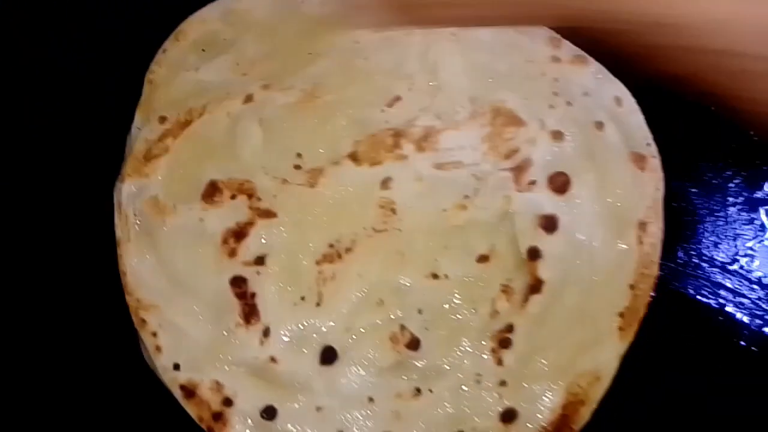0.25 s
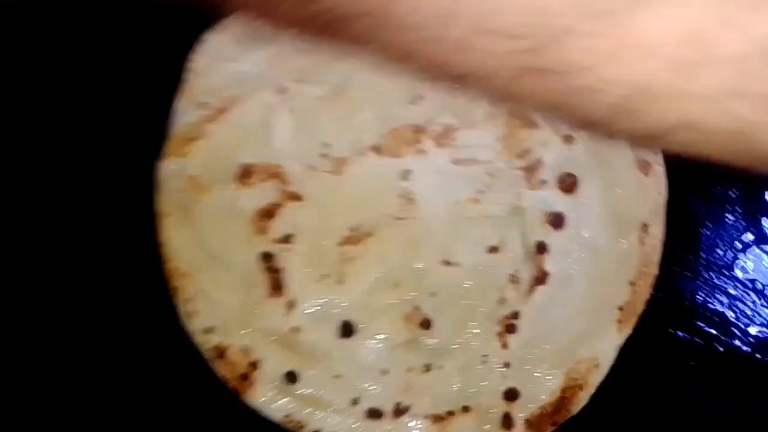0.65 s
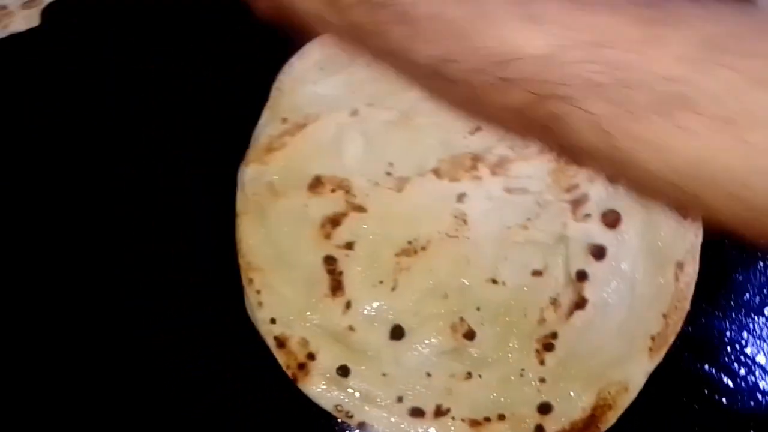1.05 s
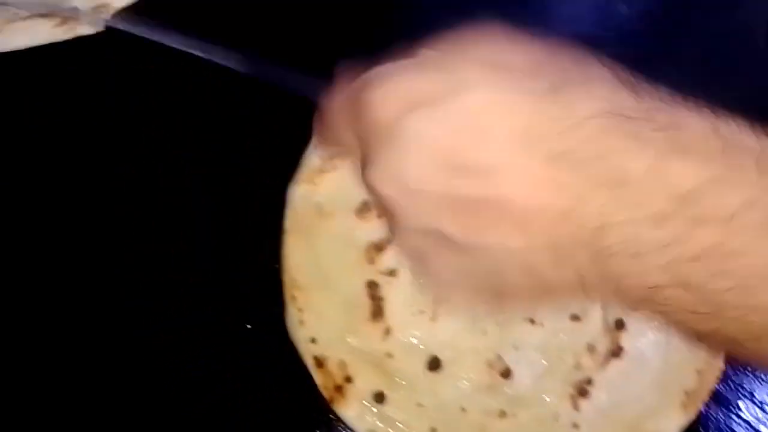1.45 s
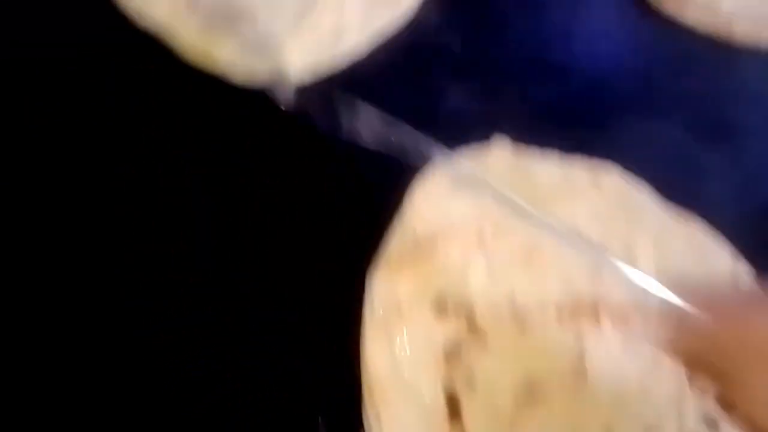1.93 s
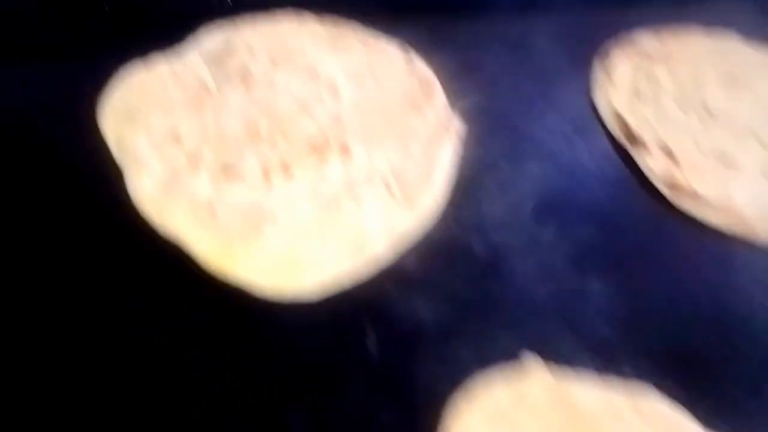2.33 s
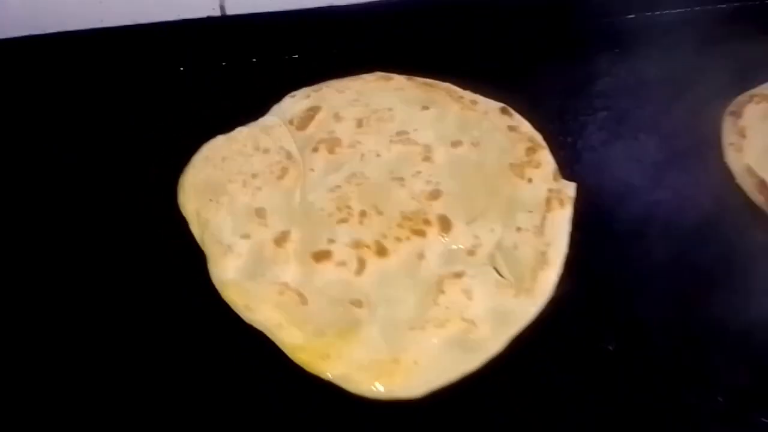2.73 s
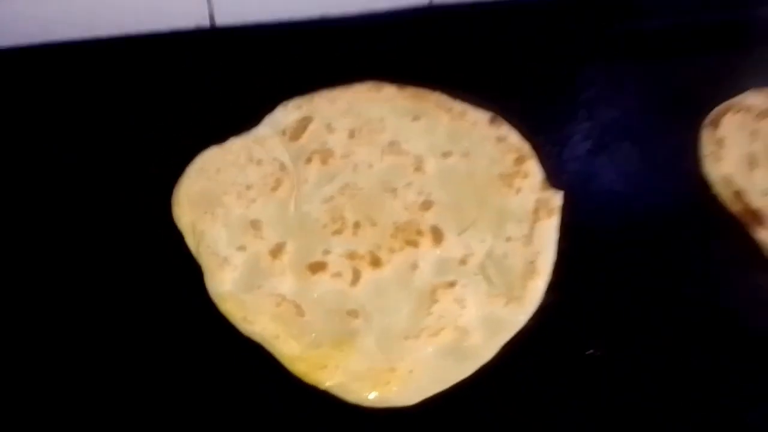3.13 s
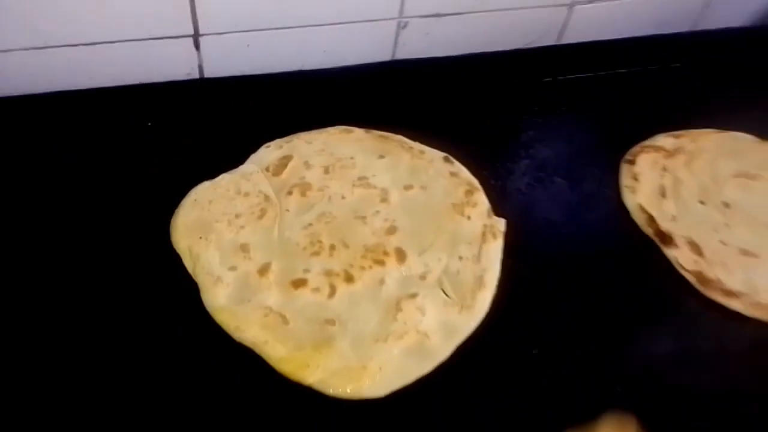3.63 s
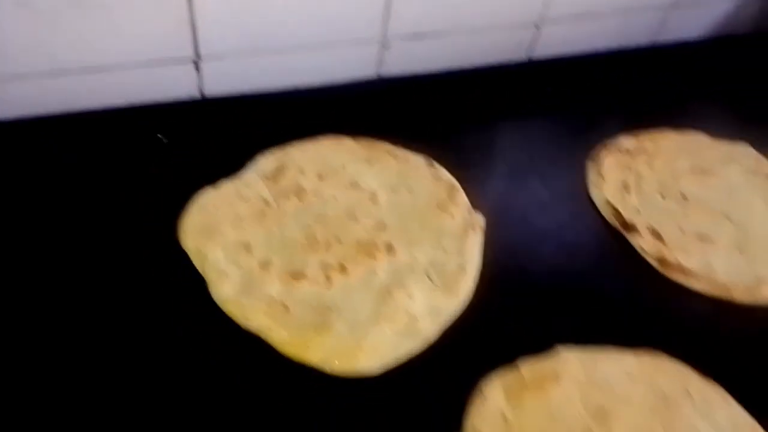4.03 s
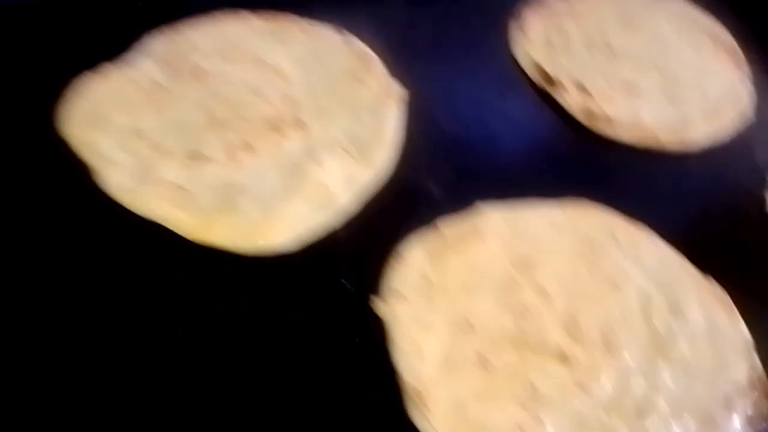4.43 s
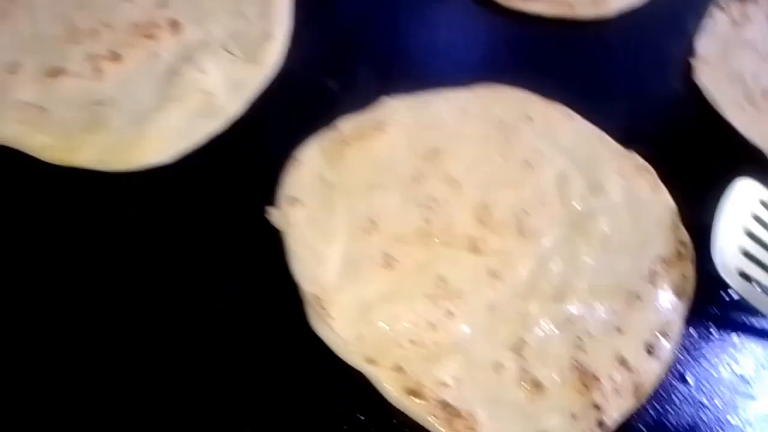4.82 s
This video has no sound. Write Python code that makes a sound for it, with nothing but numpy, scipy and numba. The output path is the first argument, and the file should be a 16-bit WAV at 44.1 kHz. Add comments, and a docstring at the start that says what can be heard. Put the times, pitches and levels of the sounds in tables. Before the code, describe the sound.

A metal spatula scrapes and knocks on a hot griddle while flatbreads faintly sizzle over a low fan hum.

```python
"""Flatbreads fry on a hot flat griddle close to a phone; an extractor fan hums in the tiled kitchen. From 0.2 s
a steel spatula scrapes, its stick-slip clicks ringing the blade, and fat spits. At 1.1 s knocks thud on the
plate. More strokes follow, the fat sputters again around 3 s, and the hardest knock lands near 4 s. From 4.55 s
the spatula knocks and scrapes again, its blade ringing with other modes."""
import sys
import numpy as np
from scipy import signal
from scipy.fft import rfft, irfft
from scipy.io import wavfile
from scipy.ndimage import uniform_filter1d
from numba import njit

SR = 44100
rng = np.random.default_rng(int(sys.argv[2]) if len(sys.argv) > 2 else 0)


def int16_out(signal):
    """Quantize to a 16-bit WAV file."""
    q = np.round(np.clip(np.atleast_2d(signal).T, -1, 1) * 32767)
    wavfile.write(sys.argv[1], SR, q.astype(np.int16))


N = 223665
T = np.arange(N) / SR
BURST_SAMPLES = 2000

# Grit between the blade's rings: f/Hz, density/dB
RASP_SPECTRUM = [(150, -28.5), (250, -17), (569, -15.5), (1150, -11.5), (1430, -20), (1560, -7), (1730, -4),
                 (2320, -10.5), (2850, -6.5), (3000, -18), (3350, -8), (6260, -2.5), (7600, -14),
                 (15000, -37)]
def scrapes():
    """Dense uneven slips ring the blade's modes, sing and squeal in its bend and edge, rasp in between."""
    push_db, bright_db, weight_db, bend_hz, edge_hz, grit_db = strokes()
    chatter = undb(push_db + 2.6 * np.clip(walk(110), -2, 1.5))
    slips = chatter * unit(rng.standard_normal(N) * undb(0.77 * rng.exponential(size=N)))

    def colour(hz, span=slice(N)):
        """Bright strokes lift high modes, heavy ones low; modes near bend and edge are favoured."""
        octaves = np.log2(hz / 2100)
        if octaves > 0:
            tilt_db = (bright_db[span] - 3.5) * np.clip((octaves - .45) / 0.99, 0, 1.2)
        else:
            tilt_db = (weight_db[span] + 13.5) * min(-octaves / 1.6, 1)
        near_bend = np.exp(-(np.log2(hz / bend_hz[span]) / 0.22) ** 2)
        near_edge = np.exp(-(np.log2(hz / edge_hz[span]) / 0.11) ** 2)
        return undb(tilt_db + 4.3 * (near_bend + near_edge))

    def drive(hz, span):
        """Each mode is caught and let go as the grip shifts."""
        return slips[span] * colour(hz, span) * undb(3.62 * walk(25.022)[span])

    rings = blades(drive, width_scale=0.9)
    bend = sweep(sweep(sweep(slips, bend_hz, 10.3), bend_hz, 4.7), bend_hz, 4.0)
    squeal_hz = bend_hz * (1 + 0.045 * walk(30))
    squeal = sweep(sweep(slips * undb(7.0 * walk(34.96)), squeal_hz, 41.0), squeal_hz, 9.9)
    edge = sweep(sweep(slips * undb(bright_db + 9.0 * walk(27.24)), edge_hz, 38.0), edge_hz, 2.6)
    bands = list(third_octaves(RASP_SPECTRUM))
    grit = sum(noise * colour(hz) for hz, noise in bands) / np.std(sum(noise for _, noise in bands))
    rasp = chatter * undb(grit_db) * grit
    return undb(18.5) * rings + undb(9) * (bend + squeal) + undb(-3.5) * edge + undb(-7) * rasp


# Blade strokes: t/s, rise/s, hold/s, fall/(dB/s), level/dB, start brightness/dB, pressed brightness/dB,
# weight on plate/dB, start bend f/Hz, end bend f/Hz, edge f/Hz at 0 dB brightness, grit/dB
BLADE_STROKES = [(0.188, 0.0018, 0.026, 80, -37.5, -3, -20.5, -22.5, 1645, 1760, 4940, -1),
                 (0.335, 0.051, 0.044, 241, -44, -13.5, -15.5, -25, 1780, 2080, 5100, 5),
                 (0.516, 0.017, 0.045, 82, -64.5, -6, 2, 2, 2150, 1780, 4660, -12),
                 (1.063, 0.035, 0.0025, 502, -43.5, -1, -8, -5.5, 2390, 2260, 4200, 3),
                 (1.63, 0.071, 0.13, 197, -60.5, -2.5, -8, -6, 2490, 1560, 3970, -0.5),
                 (1.974, 0.05, 0.18, 202, -69.5, -2, -10.5, -7, 1780, 1920, 4300, 0),
                 (2.439, 0.0047, 0.011, 458, -46, 9, -1.5, -10, 2300, 1910, 4770, 3.5),
                 (2.458, .01, 0.13, 152, -55.5, -9.5, -6, -23, 1660, 1660, 4160, -4),
                 (2.509, 0.097, 0.045, 302, -48, -2, -4, -20, 1850, 2160, 5100, 0.5),
                 (2.649, 0.021, 0.05, 153, -44.5, -11, -11, -21, 2740, 1815, 5160, -2),
                 (3.911, 0.02, 0.0019, 603, -42.5, -10, -4, -7, 2200, 2280, 3900, 0),
                 (3.958, 0.013, 0.00071, 1205, -35.5, -36, -1.5, -6.5, 2380, 2440, 3930, 9),
                 (4.176, 0.0064, 0.064, 300, -57.5, -23, -2, -18, 1870, 2040, 4100, 2),
                 (4.5648, 0.0013, 0.018, 206, -41.5, 15.5, -7, -3, 1940, 2140, 5180, -5),
                 (4.677, 0.0009, 0.02, 1400, -42, 1.5, -24.5, -9, 2380, 2400, 5500, -3),
                 (4.7114, 0.00081, .14, 372, -29.5, 1, -0.5, -2, 2440, 2327, 6070, -4)]
def strokes():
    """Each stroke rises, holds, then fades and dulls on lifting; its bend glides. The loudest rules."""
    rise_db, settled_db, dull_db_per_db, edge_oct_per_db = 15, 12, 0.5, 0.0724
    t = T[::32]
    (start_s, rise_s, hold_s, fall_db_per_s, level_db, bright0_db, bright1_db,
     weight_db, bend0_hz, bend1_hz, edge0_hz, grit_db) = np.transpose(BLADE_STROKES)[:, :, None]
    age_s = t - start_s
    press_s = rise_s + hold_s
    faded_db = fall_db_per_s * np.maximum(age_s - press_s, 0)
    push_db = np.where(age_s < 0, -200, level_db - rise_db * np.clip(1 - age_s / rise_s, 0, 1) - faded_db)
    bright_db = bright0_db + (bright1_db - bright0_db) * np.clip(age_s / press_s, 0, 1)
    bright_db -= dull_db_per_db * np.minimum(faded_db, 30)
    glide_s = press_s + settled_db / fall_db_per_s
    bend_hz = bend0_hz + (bend1_hz - bend0_hz) * np.clip(age_s / glide_s, 0, 1)
    edge_hz = edge0_hz * 2 ** (edge_oct_per_db * bright_db)
    loudest = push_db.argmax(axis=0), np.arange(len(t))
    controls = np.broadcast_arrays(push_db, bright_db, weight_db, bend_hz, edge_hz, grit_db)
    return [np.interp(T, t, control[loudest]) for control in controls]


# Modes of the blade, before and from 4.55 s: f/Hz, unscaled width/Hz, level/dB
EARLY_MODES = [(1236, 77, -17), (1570, 47, -8.5), (1666, 26, -3.5), (1743, 32, -6.5), (1830, 26, -8),
               (1933, 39, -9.5), (2044, 38, -9.5), (2147, 47, -9.5), (2403, 67, -12), (2530, 35, -13),
               (2636, 38, -9), (2740, 24, -15), (2873, 50, -15.5), (3297, 33, -15), (3770, 50, -9.5),
               (4215, 40, -14.5), (4340, 61, -12.5), (4650, 42, -12), (5126, 43, -8.5), (5200, 47, -10.5),
               (6030, 68, -16.5), (7230, 56, -14), (8130, 27, -11), (8920, 45, -17)]
LATE_MODES = [(935, 33, -17.5), (1225, 63, -13), (1574, 49, -9.5), (1853, 31, -8), (2018, 26, -6),
              (2120, 50, -8.5), (2313.4, 25, -5), (2510, 75, -10), (2628, 50, -9.5), (3370, 90, -10),
              (3700, 55, -12), (3930, 39, -12), (4420, 55, -12), (4640, 27, -9), (5170, 20, -4),
              (5210, 16, -16), (5364, 25, -11), (5753, 22, -7.5), (6026, 23, -7), (6190, 33, -12),
              (6430, 36, -8.5), (7300, 43, -12.5), (7680, 25, -16), (8200, 36, -16.5), (8630, 36, -16),
              (9210, 39, -22), (9780, 39, -19.5), (12300, 40, -46), (12800, 72, -36), (14100, 31, -37)]
def blades(drive, width_scale):
    """The blade rings with one set of modes until 4.55 s, then another; drive(hz, span) is the push on one
    mode."""
    swap = int(4.55 * SR)
    return np.concatenate([
        sum(undb(db) * mode(drive(hz, span), hz, width_scale * width_hz) for hz, width_hz, db in modes)
        for modes, span in ((EARLY_MODES, slice(swap)), (LATE_MODES, slice(swap, N)))])


# Blows on the plate: t/s, level/dB, main ring f/Hz, second ring f/Hz, clank/dB, thud/dB, edge/dB,
# decay/ms, room send/dB, blade send/dB
PLATE_KNOCKS = [(0.191, -41, 1700, 2040, -15, -40, 4.5, 3.4, 12, 17),
                (0.371, -56, 1810, 2400, -9, -30, 1, 1.8, 5, -3),
                (0.472, -38.5, 2020, 2400, -8, -27, -11, 2, 8, -9),
                (0.588, -48, 2340, 1860, -6, -27, -10, 1.8, 0, -12),
                (1.101, -30, 2400, 1650, -3, -10, -24, 7, 1, -3),
                (1.1054, -25.5, 2400, 1480, -6.5, -9, -21.5, 2.4, 4, -6),
                (1.2429, -26.5, 1620, 1134, -9.5, 2.5, -22, 4.1, -4.5, -14.5),
                (1.2567, -35.5, 2430, 1630, -14, 2, -33, 13, -2, -6),
                (2.4426, -39.5, 2620, 2010, -2, -33, 1, 2.9, -7, 3.5),
                (2.967, -52, 2020, 2560, -5, -15, -2, 1.6, 12, -5),
                (3.565, -57.5, 2150, 2480, -6, -14, 3, 6.2, 9, 0),
                (3.912, -50.5, 1880, 2500, -4, -6, -19, 3, -1, -8),
                (3.9305, -35, 1880, 2540, -4, -7.5, -19, 4.1, 3, -18),
                (3.9718, -17, 1880, 2690, 0, -12.5, -29.5, 2, -6, -8),
                (3.9852, -32, 1750, 2640, -2, -4.5, -33, 4.7, 7.5, -6),
                (4.169, -31.5, 2370, 1730, -9.5, -3, -14.5, 4.1, -2.3, -3),
                (4.5656, -35, 1660, 2660, -1, -27, 2.5, 5, -6, 5.5),
                (4.678, -44.5, 2500, 2300, -12, -25, -18, 1.7, -6, 1),
                (4.713, -22.5, 2570, 2240, -14, -27, -18.5, 2.6, -3, 2.5)]
def knocks():
    """Each blow cracks through three plate rings, a thud and a bright edge, and sets the blade ringing."""
    direct, to_room, to_blade = np.zeros((3, N + BURST_SAMPLES))
    for t, db, main_hz, second_hz, clank_db, thud_db, edge_db, decay_ms, room_db, blade_db in PLATE_KNOCKS:
        parts = ((main_hz, 450, 0), (second_hz, 450, -1.5), (3730, 500, clank_db),
                 (680, 800, thud_db), (7000, 6000, edge_db))
        blow = np.zeros(BURST_SAMPLES)
        for hz, width_hz, part_db in parts:
            ring = band(burst(decay_ms), hz, width_hz)
            ring = band(band(ring, hz, 2.76 * width_hz), hz, 2.76 * width_hz)
            blow += undb(db + part_db) * ring / abs(ring).max()
        span = slice(int(t * SR), int(t * SR) + BURST_SAMPLES)
        direct[span] += blow
        to_room[span] += blow * undb(room_db)
        to_blade[span] += blow * undb(blade_db)
    rings = blades(lambda hz, span: to_blade[span], width_scale=0.43)
    return direct[:N] + undb(7.5) * rings, to_room[:N]


# Spits of hot fat: t/s, peak level/dB
FAT_SPITS = [(0.393, -42), (0.5074, -50), (0.65, -55), (0.714, -51), (1.583, -59.5), (2.504, -56),
             (3.1478, -51), (3.176, -47), (3.272, -58), (3.404, -64), (4.397, -62), (4.4475, -46)]
# Bouts of sputtering: start t/s, end t/s, nominal rate/(pops/s)
FAT_SPUTTERS = [(0.338, 0.747, 1570), (2.8, 2.935, 410), (3.117, 3.202, 1500), (3.215, 3.316, 1560)]
def fat(sizzle_per_s=260, pop_ms=1.71, spit_hz=5740):
    """Hot fat spits over a faint sizzle of short hisses that thickens in patchy bouts."""
    out = np.zeros(N + BURST_SAMPLES)
    for t, db in FAT_SPITS:
        spit = band(burst(decay_ms=3.2), spit_hz, 1.1 * spit_hz)
        out[int(t * SR):int(t * SR) + BURST_SAMPLES] += undb(db) * spit / abs(spit).max()
    bouts = sum(float(rate) * ((T > start_s) & (T < end_s)) for start_s, end_s, rate in FAT_SPUTTERS)
    bouts = uniform_filter1d(bouts, size=800)
    for hz, db in ((5570, -80), (11000, -95)):
        pops = rng.random(N) < (sizzle_per_s + bouts * undb(5.0 * walk(70))) / SR
        sizes = undb(3.1 * np.minimum(rng.exponential(size=N), 3.5))
        puffs = signal.lfilter([1], [1, -np.exp(-1000 / (pop_ms * SR))], pops * sizes)
        out[:N] += undb(db) * band(puffs * rng.standard_normal(N), hz, width_hz=3200)
    return out[:N]


# Extractor hum: t/s, 3rd harmonic level/dB, 2nd harmonic level/dB
FAN_LEVELS = [(0.0, -72, -109), (0.34, -59, -90), (0.39, -53, -92.5), (0.87, -58.5, -93),
              (1.03, -70.5, -100), (1.13, -56, -70.5), (1.57, -61, -90.5), (1.68, -67.5, -97.5),
              (1.98, -59, -84), (2.41, -82, -92), (2.58, -71, -77), (3.04, -72.5, -79), (3.23, -80, -92.5),
              (3.87, -77, -97), (3.98, -73, -100), (4.02, -66.5, -81.5), (4.84, -62.5, -80.5),
              (5.07, -54, -88)]
# Upper motor harmonics: order, level/dB, share of the swell
FAN_HARMONICS = [(4, -75.5, 0.59), (6, -91.5, 0.035), (7, -87.5, 0.026)]
def fan(motor_hz=96.1):
    """Wavering motor harmonics over a duct rumble; both swell and sink."""
    t, *levels_db = np.transpose(FAN_LEVELS)
    hum_db, low_db = (np.interp(T, t, db) for db in levels_db)
    swell_db = hum_db - hum_db.mean()
    phase = 2 * np.pi * np.cumsum(motor_hz * (1 + 0.00283 * walk(5.025))) / SR
    harmonics = [(1, low_db + 6.5), (2, low_db), (3, hum_db)]
    harmonics += [(k, db + share * swell_db) for k, db, share in FAN_HARMONICS]
    hum = sum(undb(db + 2.17 * walk(8.6)) * np.sqrt(2) * np.sin(k * phase) for k, db in harmonics)
    rumble = unit(band(band(rng.standard_normal(N), 308.5, 99), 284, 200))
    rumble_db = -70.5 + 0.71 * swell_db + 0.48 * (low_db - low_db.mean())
    return hum + rumble * undb(rumble_db)


# Air and frying noise: f/Hz, density/dB
KITCHEN_SPECTRUM = [(120, -51), (200, -19.5), (289, -2.5), (334, -5), (387, -8), (519, -11.5), (671, -8.5),
                    (1180, -8), (2420, -6.5), (4950, -14), (5450, -13.5), (5940, -10.5), (6500, -18.5),
                    (16000, -29.5)]
def kitchen(level_db=-69.5):
    """Steady air and frying noise; bands swell together and flicker alone."""
    swell_db = walk(1.47)
    air = sum(noise * undb(swell_db + 1.3 * walk(9)) for _, noise in third_octaves(KITCHEN_SPECTRUM))
    return undb(level_db) * unit(air)


@njit
def walls(x, lags, gain, damp):
    """Echoes off the tiles: eight cross-fed delay lines, duller on every round."""
    line, soft, out = np.zeros((8, 4096)), np.zeros(8), np.zeros(len(x))
    for i in range(len(x)):
        total = 0.
        for k in range(8):
            soft[k] += (1 - damp) * (gain[k] * line[k, (i - lags[k]) & 4095] - soft[k])
            total += soft[k]
            out[i] += soft[k] * (1 - 2 * (k % 2))
        for k in range(8):
            line[k, i & 4095] = x[i] + soft[k] - total / 4
    return out


def burst(decay_ms):
    """Decaying crack of noise, peak 1."""
    t = np.arange(BURST_SAMPLES) / SR
    x = rng.standard_normal(len(t)) * np.exp(-t / (decay_ms / 1000)) * np.minimum(t / 0.00048, 1)
    return x / abs(x).max()


def band(x, hz, width_hz):
    """Two-pole resonance, centre gain 1."""
    return signal.lfilter(*signal.iirpeak(hz, hz / width_hz, fs=SR), x)


def mode(x, hz, width_hz):
    """Narrow ring with steep skirts."""
    return band(band(x, hz, width_hz), hz, 8 * width_hz)


@njit
def sweep(x, hz, q):
    """State-variable band-pass, moving centre."""
    y, mid, low = np.empty(len(x)), 0., 0.
    for i in range(len(x)):
        g = np.tan(np.pi * hz[i] / SR)
        v = (mid + g * (x[i] - low)) / (1 + g * (g + 1 / q))
        mid, low, y[i] = 2 * v - mid, low + 2 * g * v, v / q
    return y


def walk(rate_hz):
    """Random steps smoothed twice; spread near 1."""
    hold = int(SR / rate_hz)
    steps = np.repeat(rng.standard_normal(N // hold + 1), hold)
    return 1.45 * uniform_filter1d(uniform_filter1d(steps, hold), hold)[:N]


def third_octaves(spectrum):
    """Independent noise bands (f/Hz, signal) that together follow a spectrum."""
    hz, db = np.transpose(spectrum)
    bins_oct = np.log2(np.fft.rfftfreq(N, 1 / SR) + 1)
    gain = undb(np.interp(bins_oct, np.log2(hz), db))
    for centre_oct in np.log2(22) + np.arange(30) / 3:
        window = np.sqrt(np.clip(1 - 3 * abs(bins_oct - centre_oct), 0, 1))
        yield 2 ** centre_oct, irfft(rfft(rng.standard_normal(N)) * window * gain, N)


def undb(db):
    return 10 ** (np.asarray(db) / 20)


def unit(x):
    return x / np.sqrt(np.mean(x ** 2))


def scene():
    """Scrapes and knocks with their echoes, over fat, fan and kitchen noise; mono."""
    scrape = scrapes()
    knock, knock_send = knocks()
    lags, t60_s = np.array([487, 631, 797, 953, 1129, 1327, 1531, 1783]), 0.6
    room = walls(undb(3) * scrape + knock_send + 1e-18, lags, undb(-60 * lags / SR / t60_s), damp=0.49)
    return (scrape + knock + undb(-20) * room + fat() + fan() + kitchen())[None]


# Phone self-noise: f/Hz, density/dB
MURMUR_SPECTRUM = [(13, -37), (30, -25), (60, -18), (140, -16), (190, -9.5), (250, -28), (420, -120)]
def record(dry):
    """The phone steps the bass down, adds its own low murmur and cuts the very top."""
    bass_hz, bass_cut_db, murmur_db, top_hz = 187, 16, -94, 16100
    thin = signal.sosfilt(signal.ellip(5, 1, bass_cut_db, bass_hz, "high", fs=SR, output="sos"), dry)
    murmur = sum(noise * undb(4.2 * walk(4.1)) for hz, noise in third_octaves(MURMUR_SPECTRUM) if hz < 500)
    top_cut = signal.ellip(10, .2, 60, top_hz, fs=SR, output="sos")
    return signal.sosfilt(top_cut, thin + undb(murmur_db) * unit(murmur))


dry = scene()
out = record(dry)
int16_out(out)
```